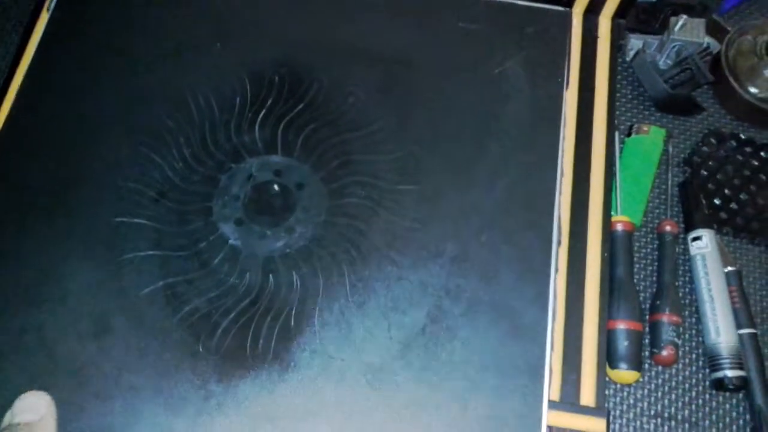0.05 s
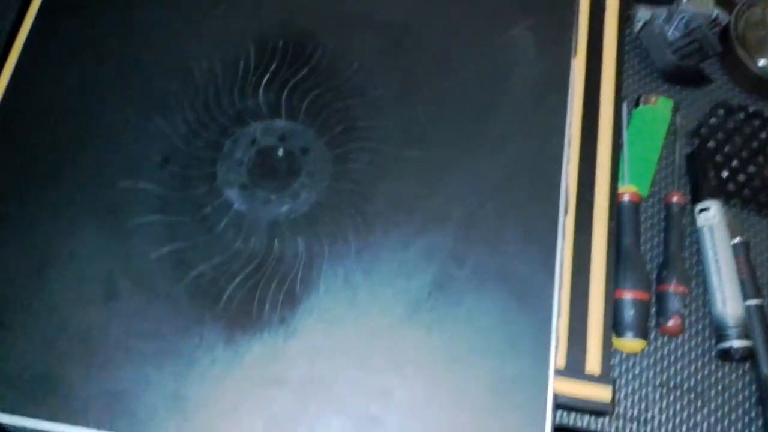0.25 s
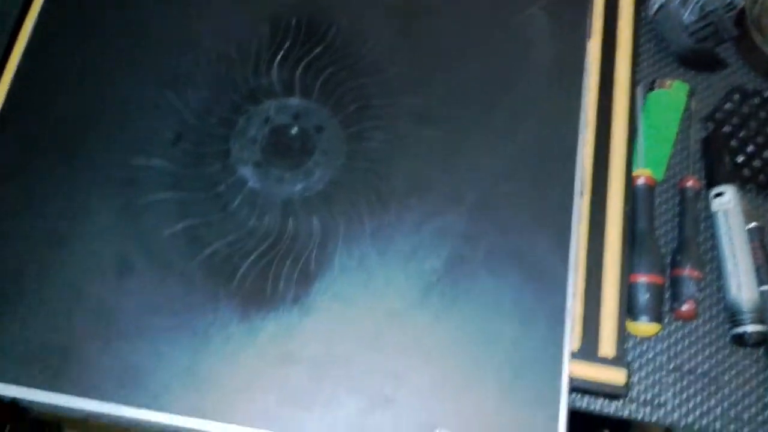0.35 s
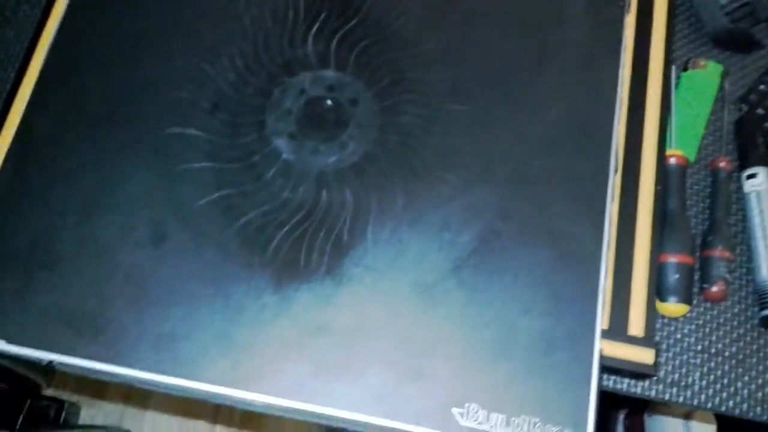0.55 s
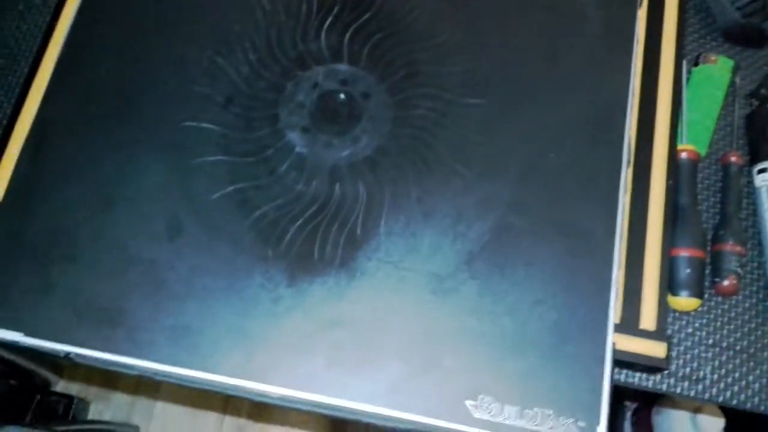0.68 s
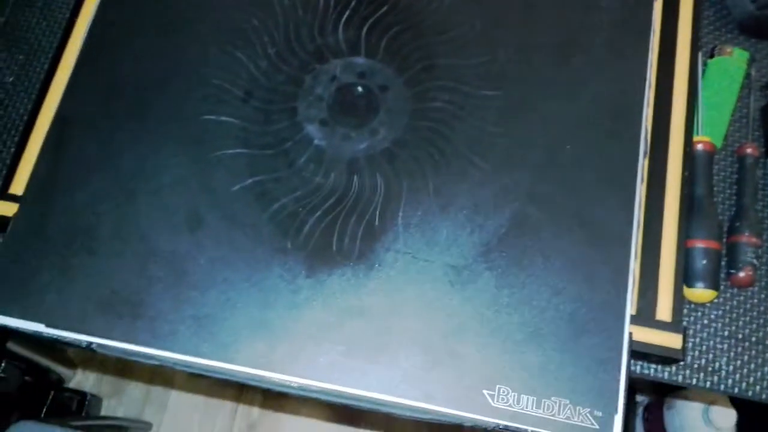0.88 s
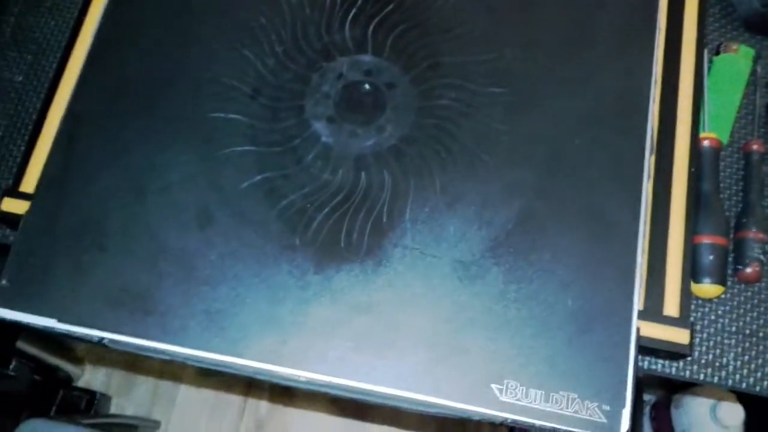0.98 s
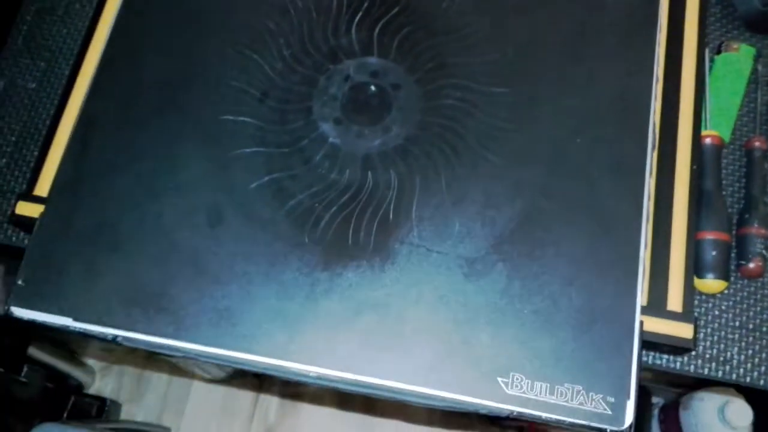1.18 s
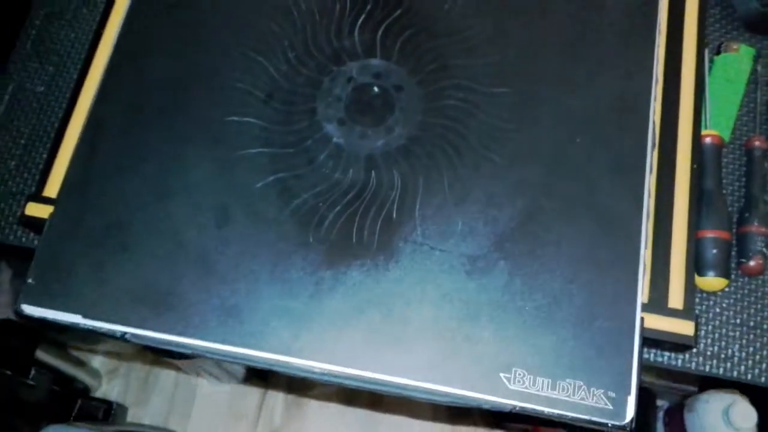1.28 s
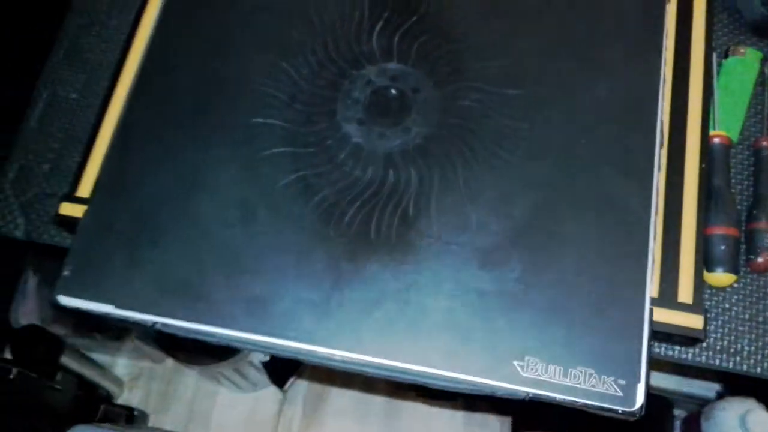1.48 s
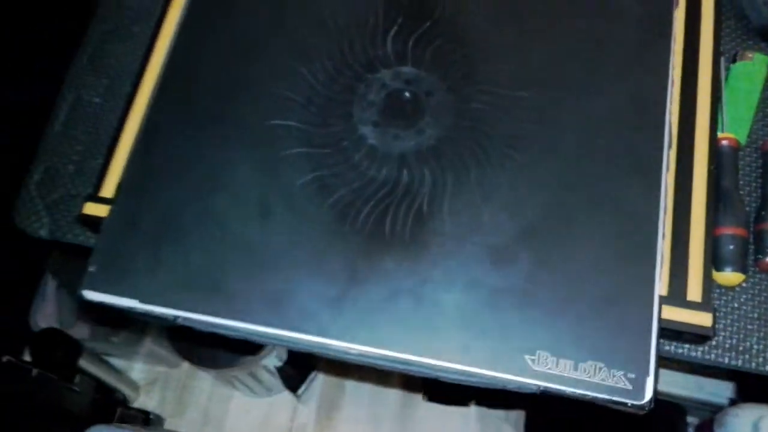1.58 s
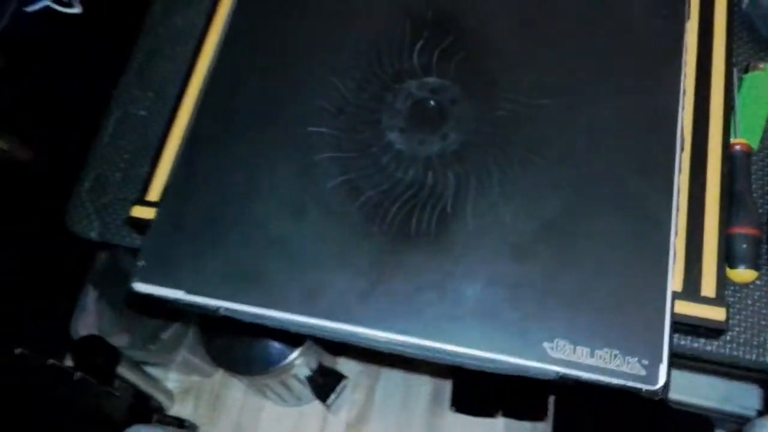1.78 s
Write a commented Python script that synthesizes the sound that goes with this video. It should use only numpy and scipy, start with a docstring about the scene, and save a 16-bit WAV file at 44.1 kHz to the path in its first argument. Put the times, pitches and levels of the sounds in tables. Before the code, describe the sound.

A sharp snap as a plastic part breaks off a printer's build plate.

```python
"""A printed plastic part is prised off a flexible build plate, close by in a small room.
A fan hums faintly from the start. At 0.13 s the strained bond begins to creak in tiny, growing slips.
At 0.23 s it breaks in four quick cracks; the freed plate rings and the walls answer some 20 ms later.
Ring and room die away, leaving the fan and a trace of hiss."""
import sys
import numpy as np
from scipy import signal
from scipy.fft import rfft, irfft
from scipy.io import wavfile
from scipy.ndimage import uniform_filter1d

SR = 44100
rng = np.random.default_rng(int(sys.argv[2]) if len(sys.argv) > 2 else 0)


def int16_out(signal):
    """Quantize to a 16-bit WAV file."""
    q = np.round(np.clip(np.atleast_2d(signal).T, -1, 1) * 32767)
    wavfile.write(sys.argv[1], SR, q.astype(np.int16))


N = 81585
IR_N = 32768  # impulse response length
IR_S, IR_HZ = np.arange(IR_N) / SR, np.fft.rfftfreq(IR_N, 1 / SR)

# Fan and room air. Each row: frequency in Hz, relative density in dB.
FAN_SPECTRUM = [(25, -17.5), (60, -13.5), (95, -11), (135, -7.5), (224, -4.5), (330, -3.5), (440, 0.6),
                (570, -2.5), (750, -2), (1000, -4), (1670, -7.5), (3180, -17), (5500, -30.5), (7500, -44.5),
                (15000, -57)]
# Drift of the fan's treble. Each row: time in seconds, gain in dB.
FAN_TREBLE_DRIFT = [(0, 3), (.55, 4), (.8, -0.64), (1.1, -2.9), (1.3, -2.5), (1.55, -0.8), (1.8, 0.5)]
# Room reverberation. Each row: band centre in Hz, relative level in dB, T60 in seconds.
ROOM_BANDS = [(55, -33.5, .33), (130, -16, .38), (330, -11, .34), (700, -7.5, .32), (1200, -5, .285),
              (2000, 0.6, .315), (2600, -2, .345), (3300, -12, .335), (5000, -13.5, .34),
              (8270, -19.5, .335), (10340, -7, .29), (12300, -19.5, .29), (15500, -10.5, .245)]
# Direct sound of a crack. Each row: frequency in Hz, relative level in dB.
CRACK_SPECTRUM = [(40, -52), (110, -34.5), (250, -21), (600, -18), (1150, -3), (1750, 3.5), (2800, -9),
                  (3900, -7.5), (6200, -21), (8300, -42.5), (10100, -22), (12000, -37), (15500, -35)]
# Modes of the plastic part. Each row: frequency in Hz, relative level in dB, T60 in seconds.
PART_MODES = [(1170, -6.5, .022), (1560, -2, .022), (1950, 1.5, .033), (2480, -8.5, .025),
              (3700, -19, .012), (10150, -12, .012)]
# Slips of the bond. Each row: frequency in Hz, gain in dB.
SLIP_SPECTRUM = [(150, 8.5), (700, 10), (900, -4), (1250, 5), (1950, -12), (2600, -20.5), (5000, -18.5),
                 (8000, -38.5), (15000, -50.5)]
# Ticks of the straining bond. Each row: start in seconds, relative level in dB, tilt in dB per octave.
STRAIN_TICKS = [(0.1607, -38, -10.5), (0.1969, -32.5, -7), (0.2244, -30, -2.5)]
# Modes of the freed plate. Each row: frequency in Hz, relative level in dB, T60 in seconds.
PLATE_MODES = [(150, -16.5, .44), (335.5, -11.5, .265), (496.5, -11.5, .275), (649.5, -9.5, .255),
               (1016.5, -4.5, .185), (1203.5, -6.8, .185), (1547.5, -9, .205), (1581.5, -5, .205),
               (1956.5, 6, .235), (2004.5, 1.2, .235), (2127, -7, .255), (2325.5, 0, .255),
               (2703.5, -5, .255)]
# Cracks of the breaking bond. Each row: start in seconds, relative level in dB, tilt in dB per octave.
BOND_CRACKS = [(0.22635, -3, 1.1), (0.22685, -11.5, -0.6), (0.22795, -10, -2.6), (0.22882, -1.13, -2.5)]


def undb(db):
    """Decibels to gain."""
    return 10 ** (np.asarray(db) / 20)


def curve_db(spectrum, hz):
    """Interpolate a spectrum on a log-frequency axis."""
    knots_hz, knots_db = np.array(spectrum, float).T
    return np.interp(np.log(hz + 1), np.log(knots_hz), knots_db)


def colour(x, spectrum):
    """Filter x by a spectrum table."""
    hz = np.fft.rfftfreq(len(x), 1 / SR)
    return irfft(rfft(x) * undb(curve_db(spectrum, hz)), len(x))


def convolve(x, response):
    """Pass x through a response; keep N samples."""
    return signal.fftconvolve(x, response)[:N]


def place(start_s, x):
    """Delay x and pad to N samples."""
    return np.concatenate([np.zeros(int(start_s * SR)), x, np.zeros(N)])[:N]


def decay(t60_s):
    """Envelope falling 60 dB in t60_s."""
    return np.exp(-np.log(1000) * IR_S / t60_s)


def click(spectrum_db):
    """Minimum-phase click with the given spectrum."""
    cepstrum = irfft(np.log(undb(spectrum_db)))
    cepstrum[1:IR_N // 2] *= 2
    cepstrum[IR_N // 2:] = 0
    return irfft(np.exp(rfft(cepstrum)))


def wander(rate_hz):
    """Slow random curve with unit spread."""
    hold = int(SR / rate_hz)
    steps = np.repeat(rng.standard_normal(N // hold + 1), hold)
    smooth = uniform_filter1d(steps, hold)[:N]
    return smooth / smooth.std()


def ringing(modes):
    """Damped modes after one push."""
    return sum(undb(db) * decay(t60_s) * np.cos(2 * np.pi * hz * IR_S) for hz, db, t60_s in modes)


def hiss(level_db=-91.5):
    """Steady white microphone noise."""
    return undb(level_db) * rng.standard_normal(N)


def fan(t, level_db=-64, split_hz=1300, flicker_db=1.73):
    """Soft rush of air; the low band flickers, the treble slowly sinks and partly returns."""
    air = colour(rng.standard_normal(N), FAN_SPECTRUM)
    air /= air.std()
    low = signal.sosfiltfilt(signal.butter(2, split_hz, fs=SR, output="sos"), air)
    low_db = -flicker_db * wander(rate_hz=20)
    treble_db = np.interp(t, *np.array(FAN_TREBLE_DRIFT).T)
    return undb(level_db) * (low * undb(low_db) + (air - low) * undb(treble_db))


def room_response(gain_db=-16.5, bench_rel_db=-7.5, walls_s=.0155, build_s=.005):
    """The bench answers at once, the walls later; single echoes melt into a wash that decays by band."""
    echoes_per_s, echo_fade_s = 1000, .052
    tail_rel_db, tail_t60_s, tail_top_hz = -28.5, .8, 7000
    chance = echoes_per_s / SR
    echoes = (rng.random(IR_N) < chance) * rng.choice([-1, 1], IR_N) / np.sqrt(chance)
    echo_share = .45 * np.exp(-IR_S / echo_fade_s)
    reflections = np.sqrt(echo_share) * echoes + np.sqrt(1 - echo_share) * rng.standard_normal(IR_N)
    band_hz, band_db, band_t60_s = np.array(ROOM_BANDS, float).T
    log_hz, log_centres = np.log(IR_HZ + 1), np.log(band_hz)
    spectrum = rfft(reflections) * undb(np.interp(log_hz, log_centres, band_db))
    tail = irfft(spectrum / (1 + (IR_HZ / tail_top_hz) ** 2))  # air absorbs the treble
    response = undb(tail_rel_db) * tail * decay(tail_t60_s)
    for weights, t60_s in zip(np.eye(len(band_hz)), band_t60_s):
        band = irfft(spectrum * np.interp(log_hz, log_centres, weights))
        response += band * decay(t60_s)
    walls_in = .5 + .5 * np.tanh(2 * (IR_S - walls_s) / build_s)
    return response * undb(gain_db + bench_rel_db * (1 - walls_in))


def part_response(crack_db=10.5, ring_db=-29.5, delay_at_1khz_s=.00025):
    """Dry crack and short ring of the part, smeared as the plate's bending waves carry treble faster."""
    crack = click(crack_db + curve_db(CRACK_SPECTRUM, IR_HZ))
    ring = undb(ring_db) * ringing(PART_MODES)
    lag_rad = 4 * np.pi * delay_at_1khz_s * np.sqrt(1000 * IR_HZ)
    dispersed = irfft(rfft(crack + ring) * np.exp(-1j * lag_rad))
    return dispersed * (IR_S < IR_S[-1] / 2)  # cut the FFT wrap-around


def fracture(start_s, level_db, tilt_db_per_oct):
    """One break in the bond: a sharp push, its spectrum tilted about 2 kHz."""
    octaves = np.log2(np.clip(IR_HZ, 1000, 8000) / 2000)
    return place(start_s, click(level_db + tilt_db_per_oct * octaves))


def creak(t, part, start_s=.13, end_s=.224, end_gain_db=-32.5, rise_db_per_s=131, slips_per_s=650):
    """Tiny random slips of the bond grow as the part bends, with a few larger ticks."""
    slips = (rng.random(N) < slips_per_s / SR) * rng.choice([-1, 1], N)
    strain = undb(end_gain_db - rise_db_per_s * np.abs(end_s - t)) * (t > start_s) * (t < end_s)
    ticks = sum(fracture(*row) for row in STRAIN_TICKS)
    return convolve(colour(slips * strain, SLIP_SPECTRUM) + ticks, part + room_response())


def plate_ring(freed_s=.229, gain_db=-35):
    """The freed plate springs back and rings."""
    return place(freed_s, undb(gain_db) * ringing(PLATE_MODES))


def snap(part, side_db=-17, bounce_decay_s=.0028):
    """The bond breaks; each crack opens at another spot and has its own echoes. Stereo."""
    pushes = [fracture(*row) for row in BOND_CRACKS]
    mid = sum(convolve(push, part + room_response()) for push in pushes)
    # Bounces off nearby things differ left and right.
    bounces = colour(rng.standard_normal(IR_N), CRACK_SPECTRUM) * np.exp(-IR_S / bounce_decay_s)
    side = undb(side_db) * convolve(sum(pushes), bounces)
    return np.array([mid + side, mid - side])


def scene():
    """Creak, snap and plate ring over fan and hiss."""
    t = np.arange(N) / SR
    part = part_response()
    return creak(t, part) + snap(part) + plate_ring() + fan(t) + hiss()


def record(dry):
    """Steep low-pass on the top treble."""
    cutoff_hz = 15800
    return signal.sosfilt(signal.ellip(10, .2, 70, cutoff_hz, fs=SR, output="sos"), dry)


dry = scene()
out = record(dry)
int16_out(out)
```